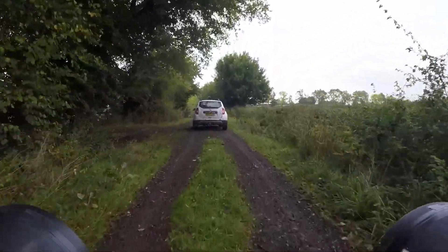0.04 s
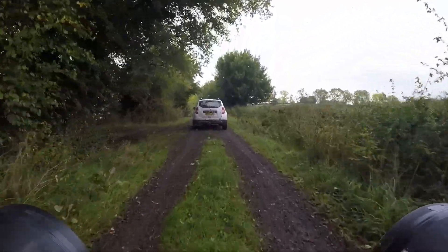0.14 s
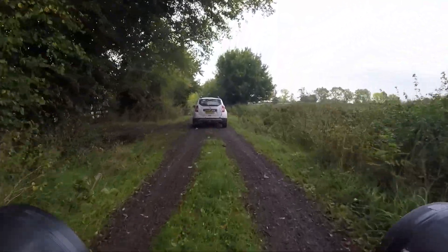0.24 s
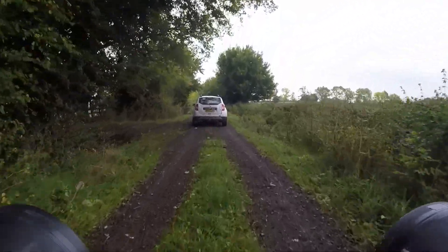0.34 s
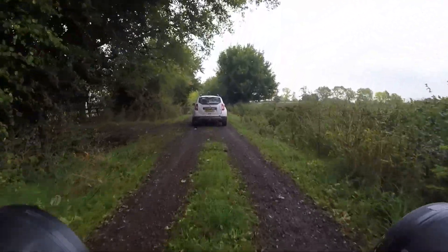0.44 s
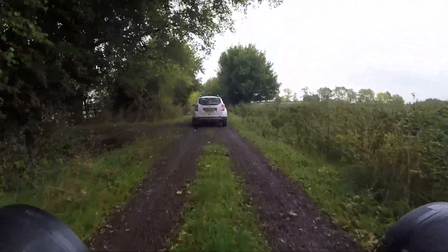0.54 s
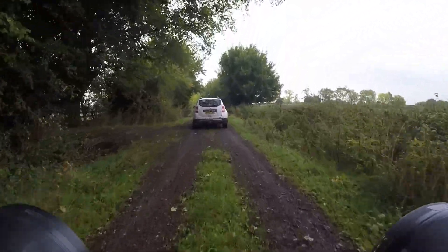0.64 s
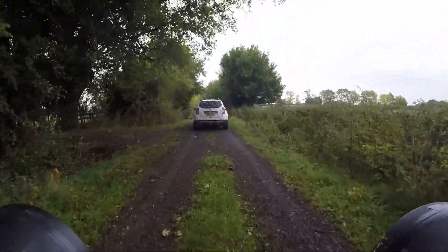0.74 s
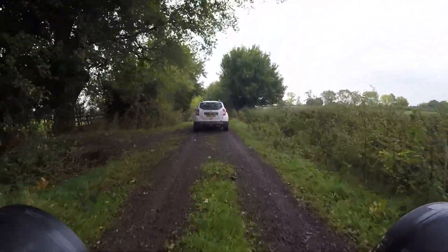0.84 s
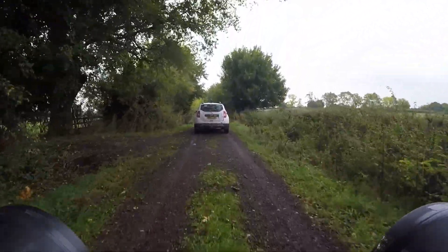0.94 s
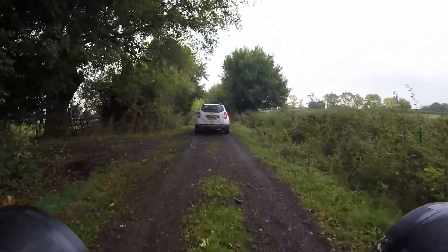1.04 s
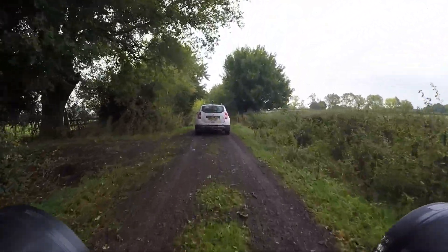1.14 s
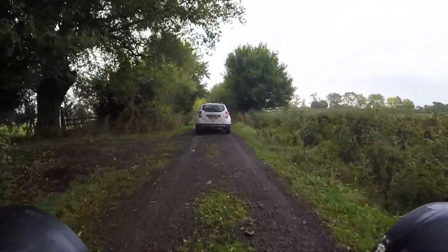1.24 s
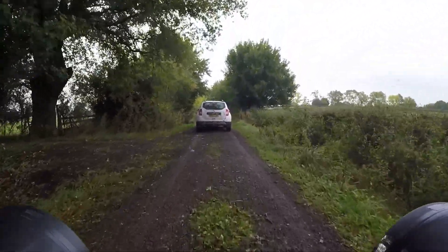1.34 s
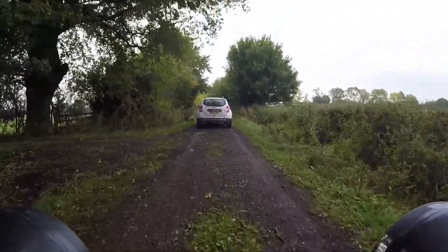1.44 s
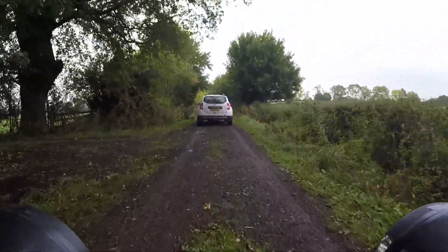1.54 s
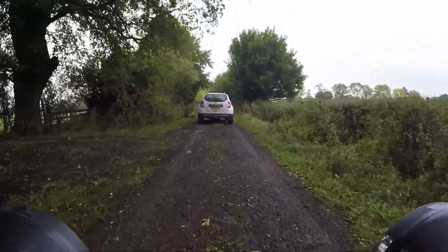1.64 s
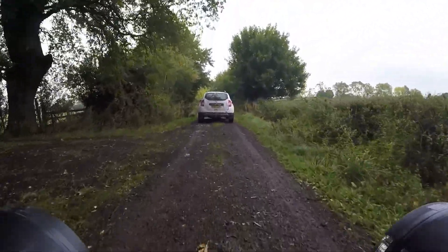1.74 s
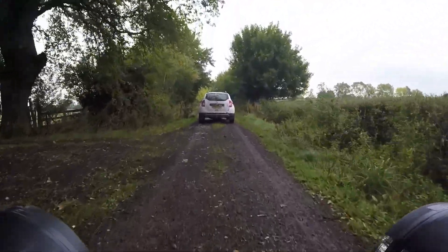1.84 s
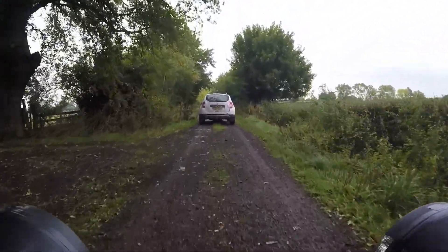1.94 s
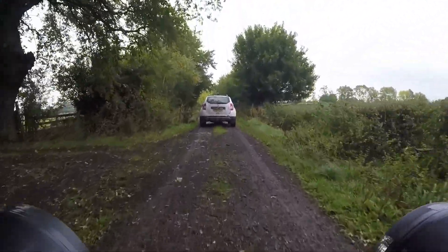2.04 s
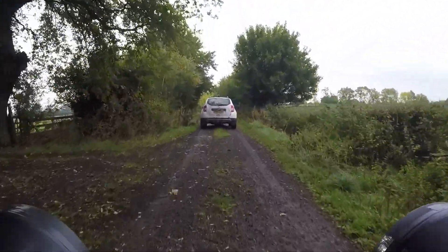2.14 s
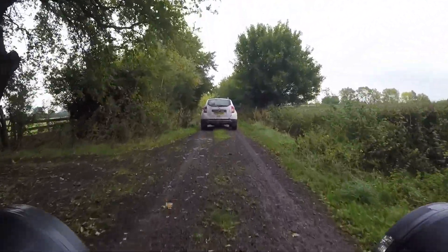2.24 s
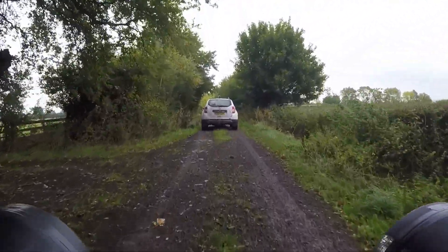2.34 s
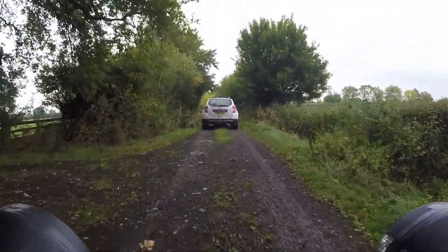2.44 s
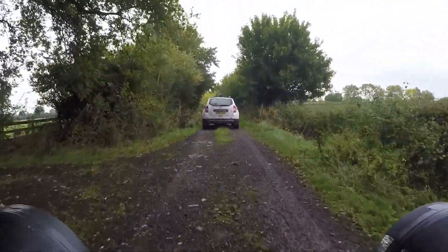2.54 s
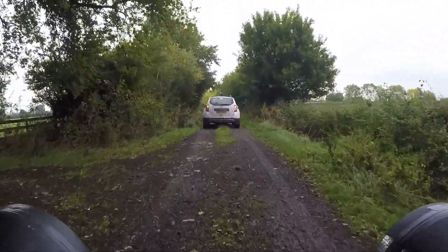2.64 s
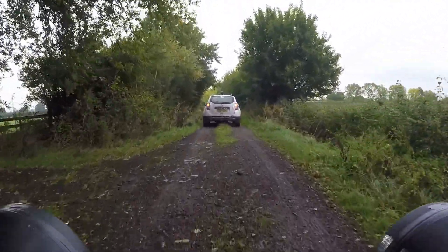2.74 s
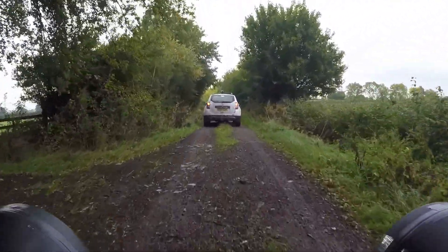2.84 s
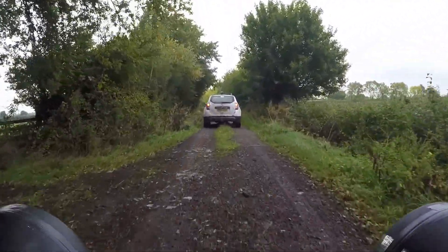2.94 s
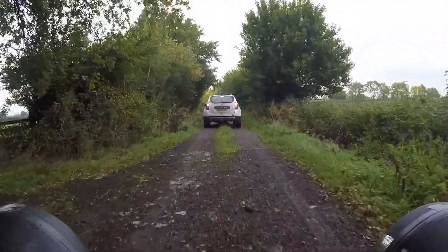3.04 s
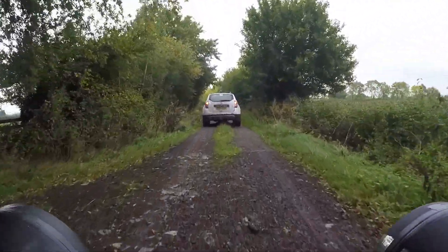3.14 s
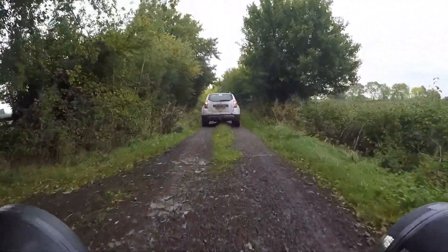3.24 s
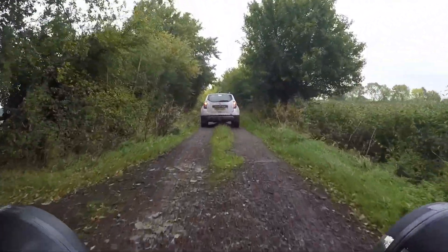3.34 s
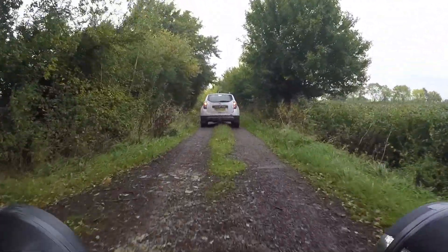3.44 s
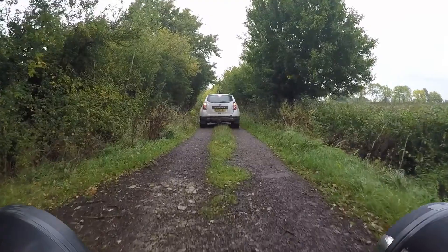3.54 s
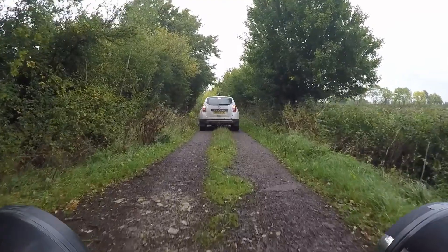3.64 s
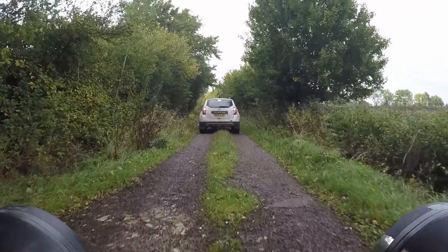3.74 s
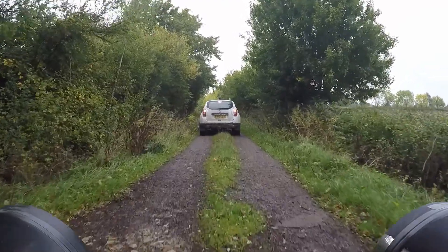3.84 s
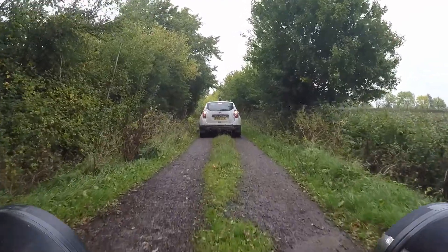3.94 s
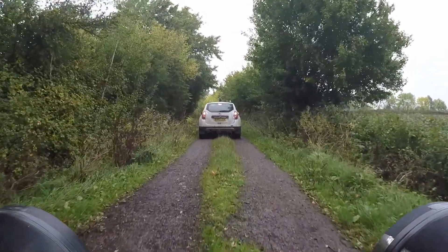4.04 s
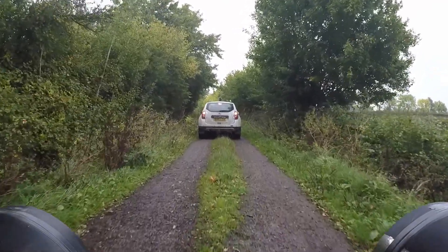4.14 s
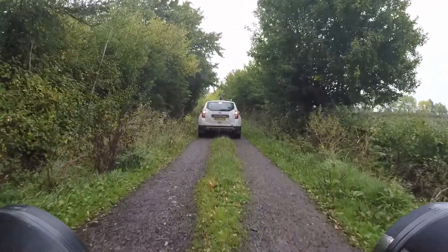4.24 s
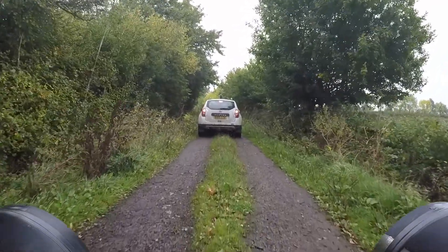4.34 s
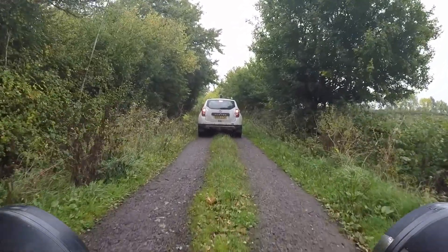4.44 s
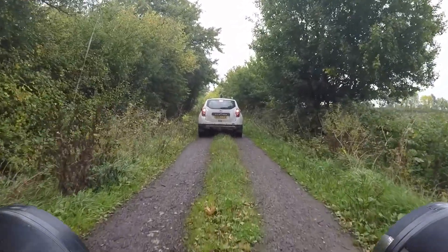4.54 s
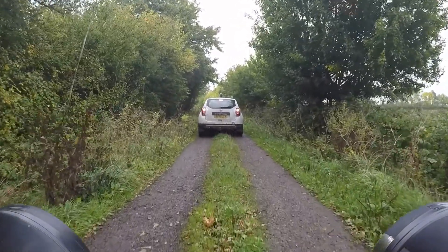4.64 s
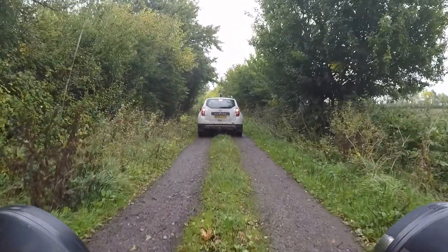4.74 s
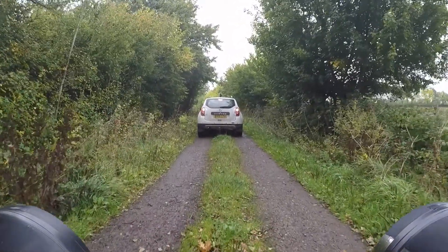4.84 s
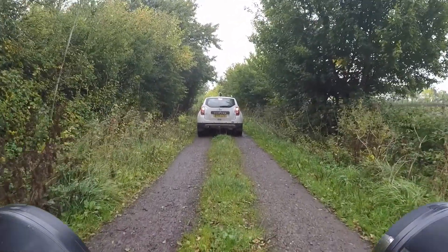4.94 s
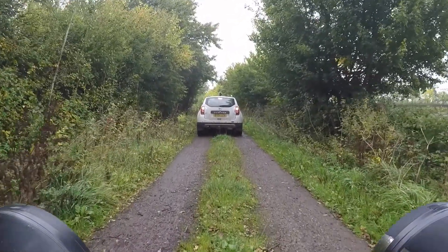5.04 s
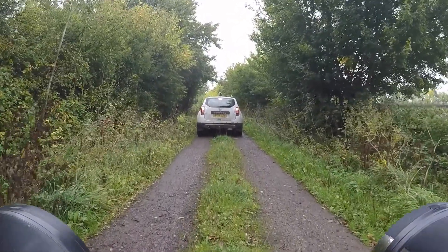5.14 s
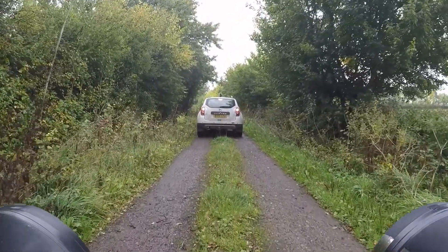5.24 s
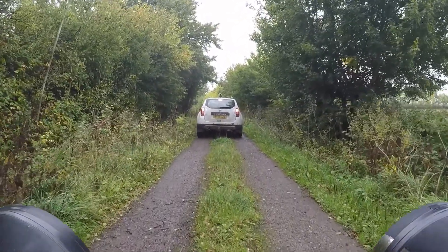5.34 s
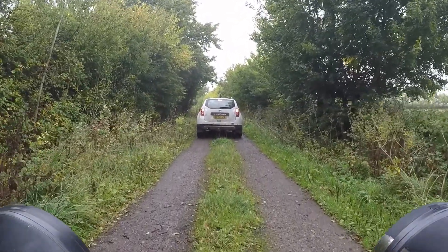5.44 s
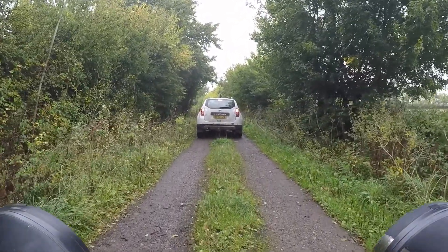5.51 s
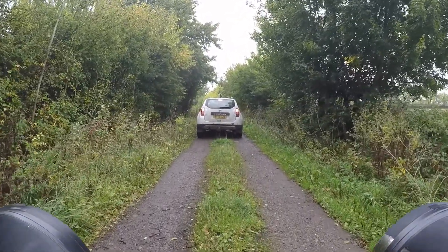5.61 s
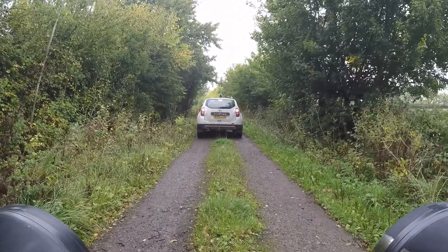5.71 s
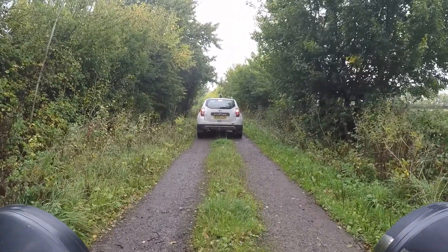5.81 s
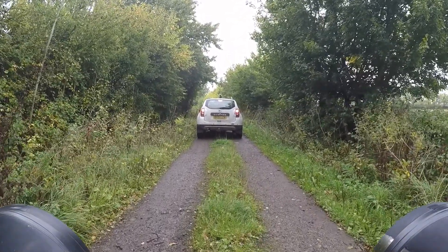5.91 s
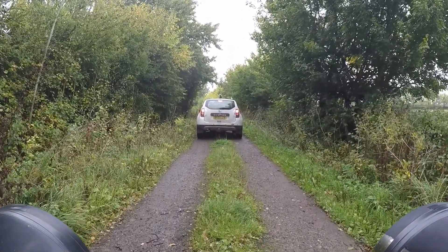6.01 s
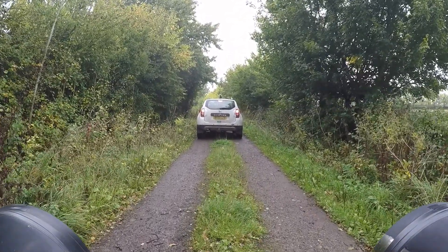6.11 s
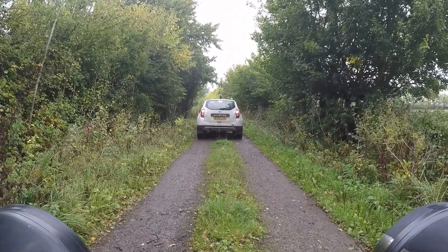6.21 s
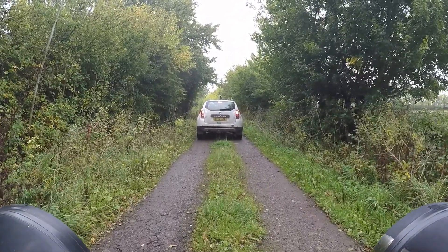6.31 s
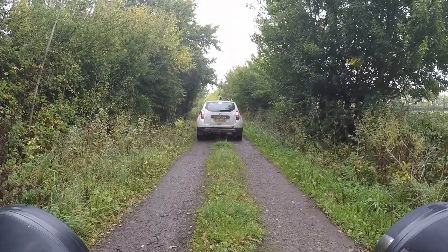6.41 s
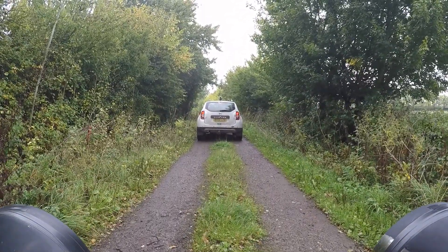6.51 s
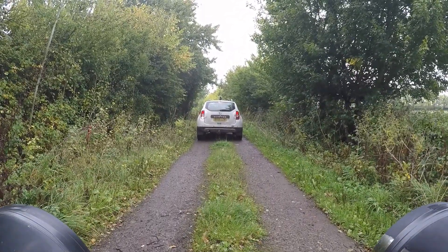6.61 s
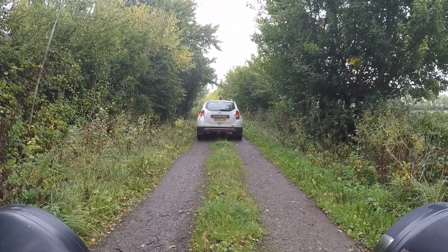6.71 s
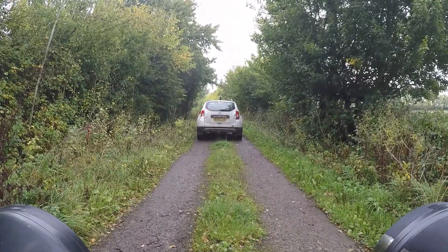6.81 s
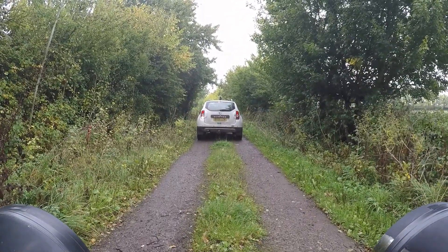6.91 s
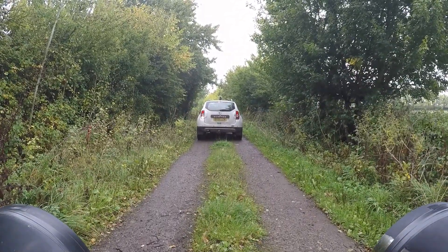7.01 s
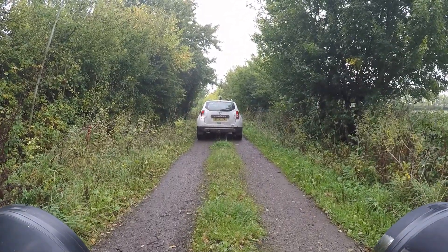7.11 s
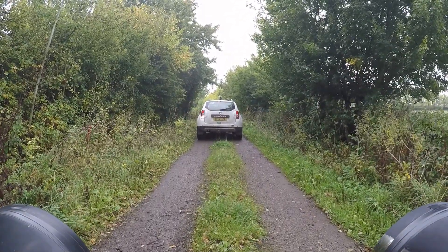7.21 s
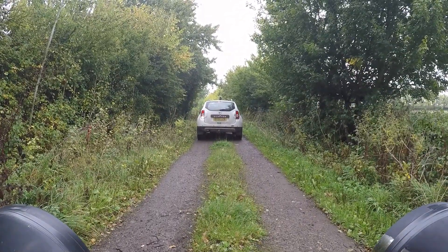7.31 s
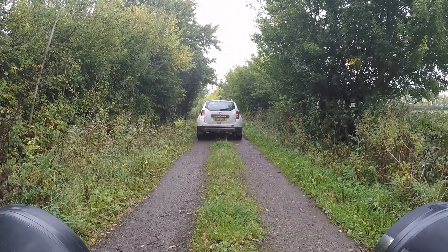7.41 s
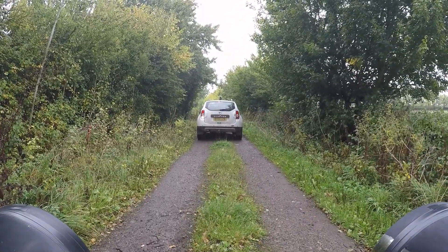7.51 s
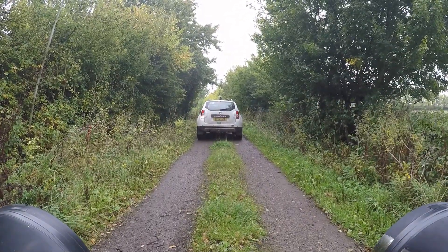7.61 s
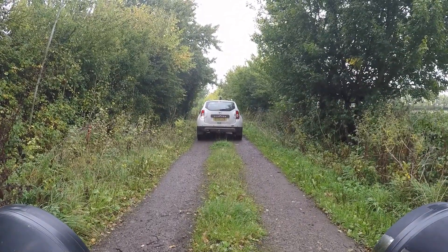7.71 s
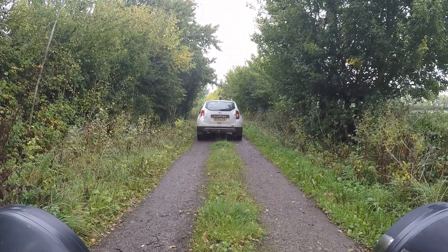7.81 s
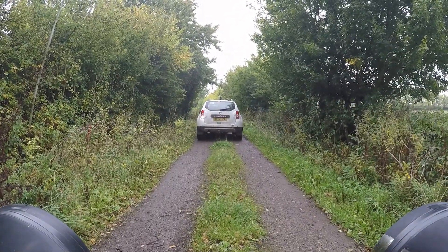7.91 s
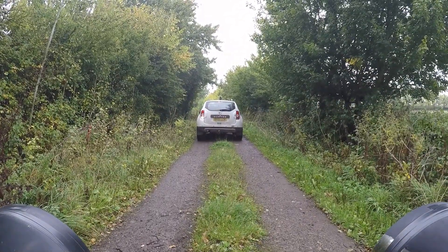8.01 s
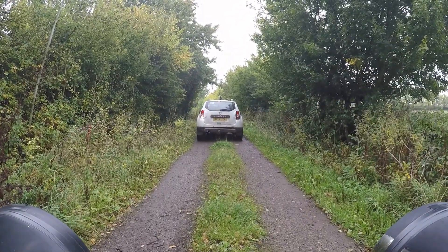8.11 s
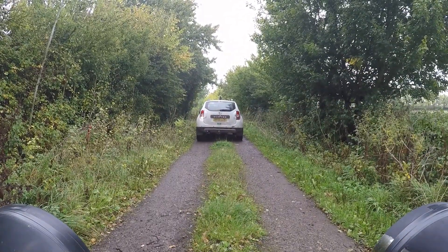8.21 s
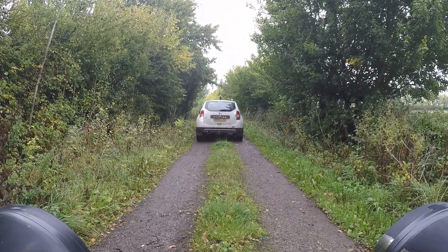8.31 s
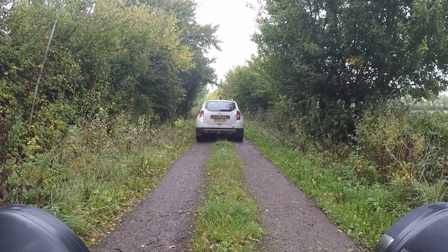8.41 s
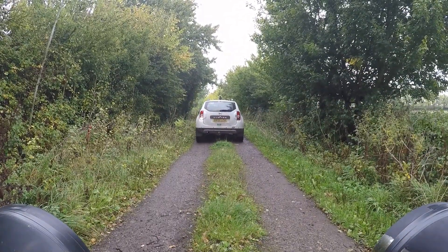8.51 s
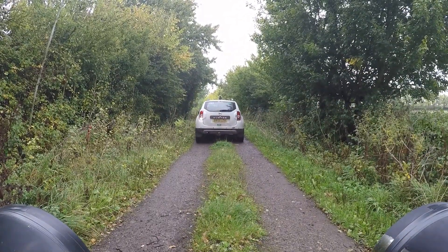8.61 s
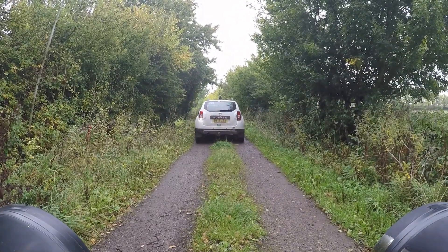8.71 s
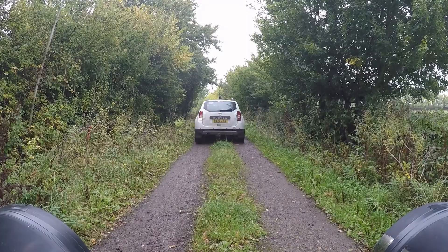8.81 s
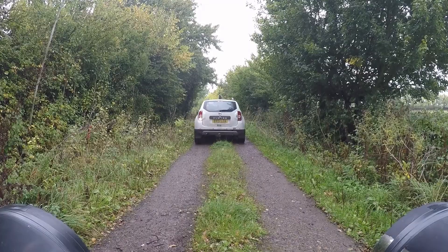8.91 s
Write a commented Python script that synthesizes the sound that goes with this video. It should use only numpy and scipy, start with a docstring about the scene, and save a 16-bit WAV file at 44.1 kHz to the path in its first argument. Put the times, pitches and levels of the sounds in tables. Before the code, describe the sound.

Close, dry outdoor sound from the bonnet of a small vehicle on a gravel track. From 0 to about 3.8 s the engine clatters steadily at some forty firings a second over a strong, uneven low boom near 33 Hz, with tyres drumming harder over ruts near 0, 1.4, 2.3 and 3.6 s and fine gravel crunching. Pebbles tick sharply around 0.7-0.8, 1.5-1.8 and 3.7 s. From 3.8 to 4.5 s the engine falls towards idle; very faint, high brake whistles come between 3.2 and 5.8 s. A last heavy sway comes near 4.8 s, then tyre noise fades. From 6 to 7.8 s it idles in slower, distinct chugs with hum, faint belt note and frame drone. A soft thud at 7.8, clicks and rattles at 8.2, heavier clunks at 8.4-8.5 s; then the engine rises with an intake rasp and rumble, ending near 9 s with another rattle.

```python
"""A gravel track, heard from the bonnet of a small utility vehicle crawling along it.
The engine clatters under load, falls to idle and picks up: bursts of filtered noise over exhaust tones.
Bumps set the body booming (a low gliding tone); tyres drum and crunch (low noise and many tiny cracks).
A brake sings thinly (narrow noise), stones tick, and gear clunks (short noise blows) come before it
moves on. A belt-driven part adds a faint note gliding with the engine; the frame and something
electrical add steady ones."""
import sys
import numpy as np
from scipy import signal
from scipy.fft import rfft, irfft, next_fast_len
from scipy.io import wavfile
from scipy.ndimage import uniform_filter1d, map_coordinates

SR = 44100
rng = np.random.default_rng(int(sys.argv[2]) if len(sys.argv) > 2 else 0)


def output_pcm(signal):
    """Save a mono or channel-first signal as 16-bit PCM at the path in sys.argv[1].

    Samples are clipped to [-1, 1] before scaling.
    """
    pcm = np.clip(np.atleast_2d(signal).T, -1, 1) * 32767
    wavfile.write(sys.argv[1], SR, np.round(pcm).astype(np.int16))


N = 395136
T = np.arange(N) / SR  # time of each sample [s]
TOP_HZ = 15300  # nothing sounds above this

# frame drone: (time [s], level [dB])
FRAME_DRONE = [(0, -58.5), (4.6, -64), (6.4, -61.5), (6.8, -52.5), (7.4, -58), (8.4, -50.5), (8.96, -66)]
FRAME_HZ, FRAME_HALF_WIDTH_HZ = 163.9, 3.7  # a narrow resonance of the frame

# brake rubs: (start [s], end [s], level [dB])
BRAKE_RUBS = [(3.186, 3.333, -73), (3.671, 3.974, -67), (4.077, 4.31, -75), (4.45, 4.83, -62.5),
              (4.79, 4.953, -68), (4.915, 5.37, -64.5), (5.328, 5.7, -67), (5.65, 5.804, -74)]
# the disc's note sinks and narrows as it slows: (time [s], pitch [Hz], full width at half gain [Hz])
DISC_NOTE = [(3.8, 11440, 270), (4.6, 11375, 100), (5.3, 11335, 30)]

# stones flicked against the underside: (time [s], tick level [dB], bounce ring level [dB])
PEBBLE_HITS = [(0.685, -34.5, -39), (0.751, -36.5, -35.5), (0.781, -32, -36), (0.828, -41, -41.5),
               (1.549, -43, -35), (1.688, -32, -31), (1.781, -39, -44), (3.733, -34, -38)]
# stone on metal: (frequency [Hz], density [dB per Hz])
PEBBLE_TONE = [(200, -19), (1000, 6.5), (2200, -1), (3800, 1), (5000, -33), (8000, -34), (15000, -31.5)]
PEBBLE_RISE_S, PEBBLE_T60_S = 0.001, 0.008  # t60: time to fall by 60 dB
BOUNCE_DELAY_S, BOUNCE_HZ, BOUNCE_T60_S = 0.0055, 1980, 0.018
BOUNCE_TICK_DB = -8  # tick in the bounce, relative to its ring

# gear lever and driveline clunks:
# (time [s], click [dB], rattle [dB], thud [dB], rise [s], t60 [s])
GEAR_CLUNKS = [(7.825, -75, -52, -35.5, 0.0047, 0.22), (8.201, -40.5, -54, -62, 0.0014, 0.055),
               (8.209, -44.5, -36, -56, 0.0015, 0.05), (8.22, -60, -38, -54, 0.003, 0.22),
               (8.393, -55, -40, -44, 0.0022, 0.091), (8.408, -54, -35.5, -31, 0.0022, 0.092),
               (8.415, -58, -38, -27, 0.001, 0.078), (8.423, -58, -44, -32, .0015, .04),
               (8.435, -68, -39, -22, 0.0038, 0.089), (8.455, -72, -52, -29, .003, 0.13),
               (8.521, -48, -38, -42, 0.0012, 0.04), (8.531, -58, -40, -32, 0.0013, .07),
               (8.902, -50, -34.5, -48, 0.006, 0.2)]
# steel on steel: (frequency [Hz], density [dB per Hz])
CLICK_TONE = [(1000, -27), (3000, 7.5), (5000, -5), (6200, 2.5), (7300, -1), (8500, -17), (11000, -20),
              (15000, -33)]
# loose covers: (frequency [Hz], density [dB per Hz])
RATTLE_TONE = [(150, -11), (450, -14), (650, -10), (950, 5), (1600, 0), (1950, 3), (2400, -9), (4200, -26),
               (6000, -41), (15000, -49)]
# blows through the frame: (frequency [Hz], density [dB per Hz])
THUD_TONE = [(30, 8), (70, 13), (110, 4), (160, -14), (190, -10), (280, -17), (350, -24), (480, -16),
             (620, -22), (1200, -17), (4000, -89)]
CHATTER_DB = 1.8  # random spread of the chattering

# tyre rumble on even ground, slowing and moving off: (time [s], level [dB])
ROLLING_LEVEL = [(0, -42.5), (4.2, -43.5), (4.95, -45.5), (5.25, -42.5), (5.8, -49), (6.5, -56),
                 (7.6, -51.5), (8.6, -54.5), (8.96, -31)]
# rutted stretches: (middle [s], half length [s], extra rumble [dB])
RUT_STRETCHES = [(0, 0.23, 6.5), (1.394, 0.29, 6.5), (2.34, 0.33, 8), (3.643, 0.63, 7.5)]
# patches of loose gravel: (middle [s], half length [s], crunch added to the packed track's [dB])
GRAVEL_PATCHES = [(0.218, .055, -58), (.8, 0.071, -67), (1.602, 0.17, -60.5), (2.6, 0.25, -61.5),
                  (3.6, 0.34, -65), (4.198, 0.23, -62), (4.8, 0.37, -63), (8.92, 0.12, -60)]
GRIT_DB = -65  # crunch of the packed track between the patches
# drumming tyres: (frequency [Hz], density [dB per Hz])
RUMBLE_TONE = [(20, -30), (52, 9), (75, -1), (100, 5.5), (130, -4.5), (160, -8.5), (200, -17.5), (270, -28),
               (500, -22.5), (1200, -67.5), (4000, -94.5)]
# crushed stones: (frequency [Hz], density [dB per Hz])
STONE_TONE = [(200, 0.5), (600, -0.5), (2000, 13.5), (4000, 12.5), (7000, 0.5), (10000, -3), (15000, -19.5)]

# how hard the track swings the body, before the body's response: (time [s], level [dB])
ROAD_SWING = [(0.0, -15), (1.2, -14), (1.87, -15.5), (2.3, -14), (3.3, -14), (4.35, -17), (4.85, -10.5),
              (5.05, -21), (5.9, -19.5), (6.5, -27.5), (7.6, -37), (8.3, -30), (8.96, -25.5)]
# bumps that widen the swing, before the body's response: (time [s], level [dB])
WIDE_BUMPS = [(0.211, -13.5), (.51, -16), (0.772, -18), (1.557, -14.5), (1.69, -14), (2.479, -17.5),
              (2.769, -19), (3.14, -22), (3.578, -14.5), (3.9, -17), (4.071, -20), (4.21, -14.5),
              (4.55, -19.5)]
# note of the swinging body: (time [s], pitch [Hz])
BODY_NOTE = [(0, 32.36), (.8, 32.75), (1.3, 33.49), (1.8, 35.43), (2.3, 31.99), (3, 32.95), (3.5, 32.98),
             (4.2, 35.8), (4.8, 33.32), (5.3, 30.68), (5.55, 33.36), (5.8, 33.93), (6.25, 32.16),
             (6.6, 32.23), (6.9, 33.13), (7.5, 32.38), (8, 36.29), (8.3, 33.33), (8.55, 31.1), (8.66, 33.5),
             (8.75, 31.5), (8.96, 37)]
# the engine rocking on its mounts, before the brief dips: (time [s], level [dB])
ENGINE_SHAKE = [(0.0, -27.5), (3.6, -29.5), (4.5, -53), (5.5, -31.5), (5.9, -23), (6.8, -22.5), (7.5, -27),
                (8.96, -17.5)]
# brief dips in the boom, mostly deepening its beats, or lifts where positive: (time [s], change [dB])
BOOM_DIPS = [(0.354, -12), (0.656, -13), (1.5, -1), (1.86, -10), (2.097, -28), (3.246, -11), (3.51, -15),
             (3.728, -19), (3.822, -14), (5.46, -7), (5.68, -4), (6.07, -4), (6.5, -6), (6.845, -9),
             (7.85, 3), (7.935, -4), (8.055, -5), (8.18, -6), (8.295, -3), (8.415, -7), (8.48, -14),
             (8.585, -10), (8.655, -11)]
BUMP_HALF_S, DIP_HALF_S = 0.045, 0.022

# engine speed: (time [s], rate [firings per second])
ENGINE_SPEED = [(0, 39), (.6, 40.3), (1.5, 39.7), (2, 40.2), (2.3, 41), (2.7, 40.1), (3.3, 40.3),
                (3.8, 37.5), (4.1, 33), (4.45, 28.2), (5, 29.2), (5.5, 29), (6, 28.2), (6.5, 27.25),
                (7, 26.2), (7.5, 25.8), (8.65, 26.9), (8.96, 33)]
CRUISE_RATE = 40  # firings per second
# belt-driven part: (time [s], level [dB])
DRIVE_LEVEL = [(0, -79), (4.4, -70.5), (5.1, -64), (5.7, -62), (6.2, -61), (6.6, -59.5), (7.1, -67.5),
               (8.2, -69), (8.96, -65)]
DRIVE_ORDER = 12  # cycles of its note per firing

# exhaust and the cavity under the bonnet, before the hum curve: (frequency [Hz], partial level [dB rms])
EXHAUST_TONE = [(55, -52), (85, -58), (105, -51), (125, -62.5), (147, -53), (165, -64.5), (182, -67.5),
                (250, -69), (300, -72), (325, -64.5), (350, -67.5), (372, -91), (430, -67.5), (540, -95),
                (640, -60.5), (700, -81), (790, -56.5), (860, -83.5)]
# the hum stands out as the engine settles to idle: (time [s], change [dB])
HUM_CHANGE = [(0, -3), (4.0, -3), (4.8, -1.5), (5.8, 2), (6.5, -1), (7.5, 0), (8.96, -0.5)]
# engine block and covers: (frequency [Hz], density [dB per Hz])
BLOCK_TONE = [(200, -12), (320, -13.5), (375, -23.5), (420, -15.5), (560, -15), (700, -14), (850, -2.5),
              (1050, -2), (1250, 0), (1450, -4.5), (1630, -2.5), (1750, -0.5), (1970, -1.5), (2090, -29.5),
              (2600, -24), (5000, -40.5)]
# ringing panels: (frequency [Hz], width [Hz], level [dB])
PANEL_RINGS = [(642, 55, -11), (746, 16, -3), (791.3, 11, 3.5), (892.7, 13.2, 11), (932, 26.6, 10),
               (998, 17, 7), (1105, 12, 0), (1353, 41, 0), (1495, 25, 1), (1554, 22, 0), (1845, 20, 2.5),
               (1892, 45, 6), (1964, 27, 1), (2037, 22, -9.5)]
# valve gear and intake: (frequency [Hz], density [dB per Hz])
VALVE_TONE = [(300, -1.5), (1500, 0.5), (2300, 1), (2800, -6.5), (3100, -1.5), (3800, -4.5), (4500, -9),
              (5050, -16), (5600, -16), (6100, -10.5), (6450, -15), (6900, -15), (8300, -25),
              (15000, -36.5)]
# ringing of the valve cover: (frequency [Hz], width [Hz], level relative to the valve tone [dB])
COVER_RINGS = [(2400, 60, -4.5), (3180, 18, 3), (3700, 60, 3), (4470, 220, 0.5), (6050, 70, -4),
               (6820, 110, 1), (7240, 70, -1.5)]
# intake rasp: (frequency [Hz], density [dB per Hz])
INTAKE_TONE = [(60, -10), (200, 3), (260, 8.5), (400, -14), (700, 2), (950, 6.5), (1900, 1.5), (2350, 1.5),
               (2750, -15), (4200, -12), (5200, -27), (8000, -28), (15000, -60)]
# throttle opening to move off: (time [s], rasp level [dB])
THROTTLE_RASP = [(8.55, -88), (8.75, -46.5), (8.93, -34.5)]
RASP_SCATTER_DB = 4

# level at cruising speed on even ground [dB], growth [dB per octave of speed], growth [dB per dB of rut]
CLATTER_DB, CLATTER_DB_PER_OCTAVE, CLATTER_PER_RUT = -39.5, 1.4, 0.31
VALVES_DB, VALVES_DB_PER_OCTAVE, VALVES_PER_RUT = -49, 6, 0.37
BLUR_DB_PER_OCTAVE = 22  # how fast the strokes run together as the engine speeds up
BLOCK_BETWEEN, VALVES_BETWEEN = 2.6, 3.2  # steady share between strokes at cruising speed
FIRING_LIFE = 0.5  # fading time of a stroke, as a share of its own cycle


def amp(db):
    """Turn decibels into gain."""
    return 10 ** (np.asarray(db) / 20)


def unit(x):
    """Scale x to an rms of 1."""
    return x / np.sqrt(np.mean(x ** 2) + 1e-20)


def sine(cycles):
    """A pure tone of rms 1, from a count of cycles."""
    return np.sqrt(2) * np.sin(2 * np.pi * cycles)


def curve(rows):
    """Join (time, value) rows by straight lines, one value per sample."""
    return np.interp(T, *np.transpose(rows))


def colour(points):
    """Gain at any frequency, from (Hz, dB) points joined on a log axis."""
    f, db = np.transpose(points)
    return lambda hz: amp(np.interp(np.log(hz + 1), np.log(f), db))


def bell(hz, centre, half_width):
    """A resonance peak: 1 at its centre, half at half_width to either side."""
    return 1 / (1 + ((hz - centre) / half_width) ** 2)


def peaks(hz, rows):
    """Summed power of several resonances."""
    return sum(amp(db) ** 2 * bell(hz, centre, width) ** 2 for centre, width, db in rows)


def wobble(rate):
    """A smooth random curve with rate random points a second."""
    return map_coordinates(rng.standard_normal(int(N * rate / SR) + 4), [T * rate])


def filtered(x, response):
    """Shape the frequencies of x by a response."""
    size = next_fast_len(N + SR // 2)
    return irfft(rfft(x, size) * response(np.fft.rfftfreq(size, 1 / SR)), size)[:N]


def noise(response, gate=1):
    """Noise opened and closed by a gate, then shaped by a response; rms 1."""
    return unit(filtered(gate * rng.standard_normal(N), response))


def swell(middle, half_length):
    """A smooth rise and fall, 1 at its middle."""
    return np.exp(-((T - middle) / half_length) ** 2)


def blow(start, rise, t60):
    """A quick rise, then a fall by the same share in each equal time."""
    age = np.maximum(T - start, 0)
    return np.minimum(age / rise, 1) * np.exp(-np.log(1000) * np.maximum(age - rise, 0) / t60)


def whine(pitch_hz=8631, level_db=-83):
    """A faint electrical whine: one tone whose phase quivers slightly."""
    return amp(level_db) * np.sin(2 * np.pi * pitch_hz * T + 0.6 * wobble(24))


def frame():
    """The frame drones on one note, clearest at idle: noise through a narrow resonance."""
    return amp(curve(FRAME_DRONE)) * noise(lambda hz: bell(hz, FRAME_HZ, FRAME_HALF_WIDTH_HZ))


def brake(fade_s=0.055):
    """A pad rubs the disc: a hoarse whistle, narrower from rub to rub as the wheel slows."""
    out = np.zeros(N)
    times, pitches, widths = np.transpose(DISC_NOTE)
    for start, end, db in BRAKE_RUBS:
        pitch = np.interp(start, times, pitches)
        width = np.interp(start, times, widths)
        contact = np.clip(np.minimum(T - start, end - T) / fade_s, 0, 1)
        out += amp(db) * contact * noise(lambda hz: bell(hz, pitch, 0.5 * width))
    return out


def pebbles():
    """A stone ticks brightly on the underside, then bounces once and rings a panel."""
    tick, out = noise(colour(PEBBLE_TONE)), np.zeros(N)
    for start, tick_db, ring_db in PEBBLE_HITS:
        out += amp(tick_db) * blow(start, PEBBLE_RISE_S, PEBBLE_T60_S) * tick
        pitch = BOUNCE_HZ * (1 + 0.03 * rng.standard_normal())
        bounce = sine(pitch * T) + amp(BOUNCE_TICK_DB) * tick
        out += amp(ring_db) * blow(start + BOUNCE_DELAY_S, PEBBLE_RISE_S, BOUNCE_T60_S) * bounce
    return out


def knocks(chatter_per_s=260, ring_db=-4):
    """Gear blows click on steel, set loose covers chattering and thud through the ringing frame."""
    chatter = unit(amp(CHATTER_DB * wobble(chatter_per_s)))
    click = noise(colour(CLICK_TONE), chatter)
    rattle = noise(colour(RATTLE_TONE), chatter)
    thud = unit(noise(colour(THUD_TONE)) + amp(ring_db) * sine(FRAME_HZ * T))
    out = np.zeros(N)
    for start, click_db, rattle_db, thud_db, rise, t60 in GEAR_CLUNKS:
        mix = amp(click_db) * click + amp(rattle_db) * rattle + amp(thud_db) * thud
        out += blow(start, rise, t60) * mix
    return out


def tyres(rut_db, stones_per_s=1400, spread_db=4, crack_s=0.00077):
    """The tread drums on the ruts and crushes many small stones, a few of them loudly."""
    rumble = amp(curve(ROLLING_LEVEL) + rut_db) * noise(colour(RUMBLE_TONE))
    sizes = amp(spread_db * np.minimum(rng.exponential(size=N), 4))
    cracks = (rng.random(N) < stones_per_s / SR) * sizes
    # every crack dies away within moments
    grains = signal.lfilter([1], [1, -np.exp(-1 / (crack_s * SR))], cracks)
    patches = sum(amp(db) * swell(middle, half) for middle, half, db in GRAVEL_PATCHES)
    return rumble + (amp(GRIT_DB) + patches) * noise(colour(STONE_TONE), grains)


def boom(firings, swing_db=2, jolts_db=-12):
    """The body swings near one low note, wider at bumps, and beats against the engine's shake."""
    road = amp(curve(ROAD_SWING))
    reach = road + sum(amp(db) * swell(s, BUMP_HALF_S) for s, db in WIDE_BUMPS)
    swing = reach * sine(np.cumsum(curve(BODY_NOTE)) / SR)
    jolt_tone = colour([(12, -25), (22, -10.5), (42, 12), (55, -7.5), (90, -43)])
    jolts = amp(jolts_db) * road * noise(jolt_tone)
    body_response = colour([(10, 0), (22, 3), (43, -4), (56, -3), (90, -28)])
    body = filtered(amp(swing_db) * swing + jolts, body_response)
    shake = amp(curve(ENGINE_SHAKE)) * sine(firings)
    dips = 1 - sum((1 - amp(db)) * swell(s, DIP_HALF_S) for s, db in BOOM_DIPS)
    return dips * (body + shake)


def drive(firings):
    """A belt-driven part sings at a multiple of the firing rate, clearest as the vehicle coasts."""
    return amp(curve(DRIVE_LEVEL)) * sine(DRIVE_ORDER * firings)


def hum(firings, half_order_db=-9, waver_db=0.5, count=60):
    """Exhaust partials glide through fixed resonances; uneven firing adds weak lines halfway between."""
    rate, pipe, out = curve(ENGINE_SPEED), colour(EXHAUST_TONE), np.zeros(N)
    for half_turns in range(3, count):
        order = half_turns / 2
        if order == DRIVE_ORDER:  # this partial belongs to the belt drive
            continue
        level = amp(half_order_db * (half_turns % 2)) * pipe(order * rate)
        out += level * sine(order * firings + rng.random())
    return out * amp(curve(HUM_CHANGE) + waver_db * wobble(2))


def ringing(hz):
    """The block's broad response plus its panels, arranged so no ring starts before its blow."""
    power = colour(BLOCK_TONE)(hz) ** 2 + peaks(hz, PANEL_RINGS)
    # minimum phase: fold the cepstrum (the spectrum of the log spectrum) onto its first half
    cepstrum = irfft(np.log(power) / 2)
    half = len(cepstrum) // 2
    return np.exp(rfft(np.r_[cepstrum[0], 2 * cepstrum[1:half], np.zeros(half)]))


def cover(hz):
    """The valve gear's broad response with the cover's narrow resonances."""
    return colour(VALVE_TONE)(hz) * np.sqrt(1 + peaks(hz, COVER_RINGS))


def octaves():
    """Engine speed in octaves above cruising."""
    return np.log2(curve(ENGINE_SPEED) / CRUISE_RATE)


def valve_pattern(firings, depth_db, count=28):
    """The tappets tick unevenly, in a pattern that comes round every four firings."""
    sizes = amp(depth_db * rng.standard_normal(count))
    return np.interp(firings / 4 % 1, np.arange(count) / count, sizes, period=1)


def strokes(firings, life, scatter_db, between):
    """Each cycle starts a soft-edged burst of its own size, fading onto a steady share; mean about 1."""
    sizes = amp(scatter_db * rng.standard_normal(int(firings[-1]) + 2))
    bursts = sizes[firings.astype(int)] * np.exp(-(firings % 1) / life)
    bursts = uniform_filter1d(bursts, size=SR // 110)
    return (between + bursts) / (between + bursts.mean())


def engine(firings, rut_db):
    """Firings rattle the block, tick the valves and puff into the exhaust; ruts make it labour."""
    # strokes stand apart at idle and run together under way
    blur = amp(BLUR_DB_PER_OCTAVE * octaves())

    blows = strokes(firings, FIRING_LIFE, scatter_db=0.15, between=BLOCK_BETWEEN * blur)
    blows = blows * strokes(2 * firings + 0.35, FIRING_LIFE, scatter_db=0.5, between=2.6)
    clatter_db = CLATTER_DB + CLATTER_DB_PER_OCTAVE * octaves() + CLATTER_PER_RUT * rut_db
    clatter = amp(clatter_db) * noise(ringing, blows * valve_pattern(firings, depth_db=0.7))

    ticks = strokes(firings, FIRING_LIFE, scatter_db=2, between=VALVES_BETWEEN * blur)
    ticks = ticks * valve_pattern(firings, depth_db=1)
    valves_db = VALVES_DB + VALVES_DB_PER_OCTAVE * octaves() + VALVES_PER_RUT * rut_db
    valves = amp(valves_db) * noise(cover, ticks)

    # opening the throttle to move off adds a rasp from the intake
    puffs = strokes(firings, life=0.5, scatter_db=RASP_SCATTER_DB, between=1)
    rasp = amp(curve(THROTTLE_RASP)) * noise(colour(INTAKE_TONE), puffs)
    return clatter + valves + rasp + hum(firings)


def scene():
    """Add up all the sounds; engine, belt and shake share one count of firings."""
    firings = np.cumsum(curve(ENGINE_SPEED)) / SR
    rut_db = sum(db * swell(middle, half) for middle, half, db in RUT_STRETCHES)
    background = whine() + frame() + brake() + pebbles() + knocks()
    vehicle = tyres(rut_db) + boom(firings) + drive(firings) + engine(firings, rut_db)
    return (background + vehicle)[None]


def record(dry):
    """Keep only what lies below the top frequency."""
    return np.array([filtered(channel, lambda hz: hz < TOP_HZ) for channel in dry])


dry = scene()
out = record(dry)
output_pcm(out)
```